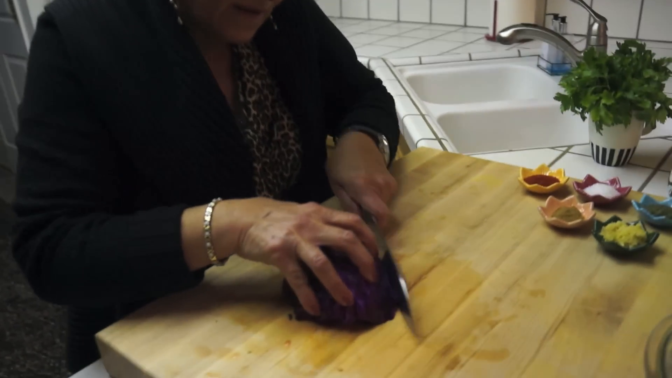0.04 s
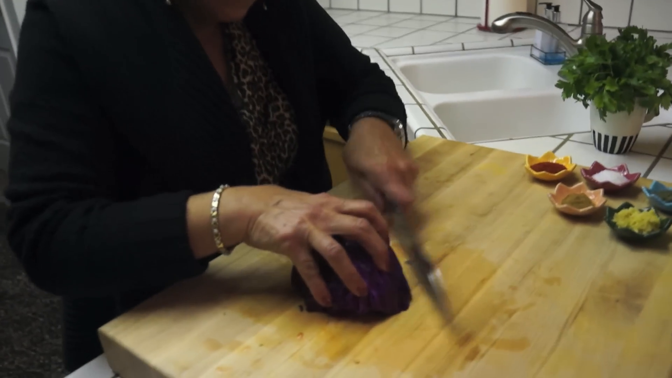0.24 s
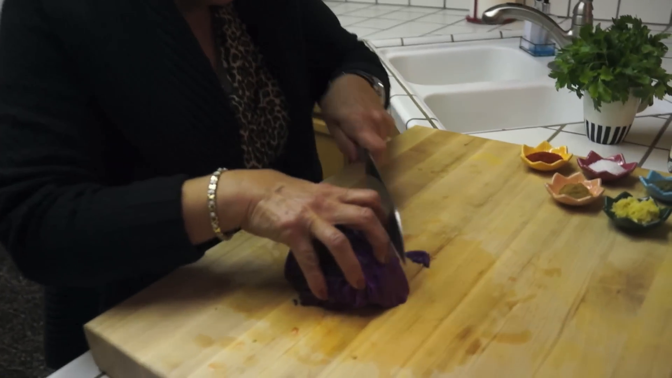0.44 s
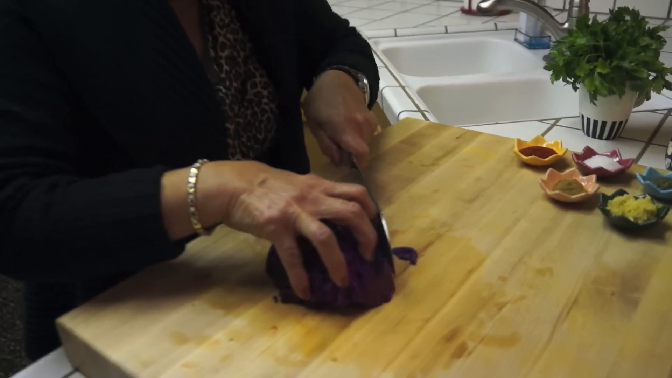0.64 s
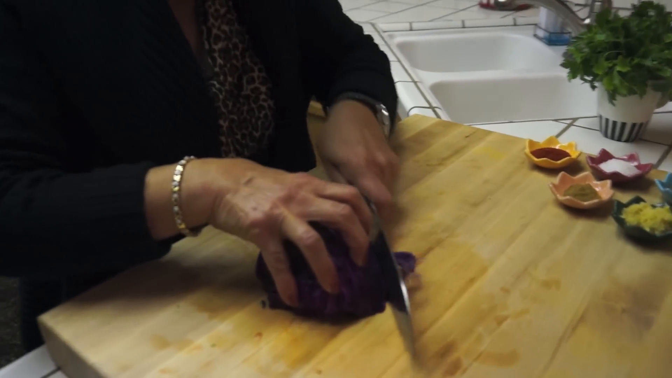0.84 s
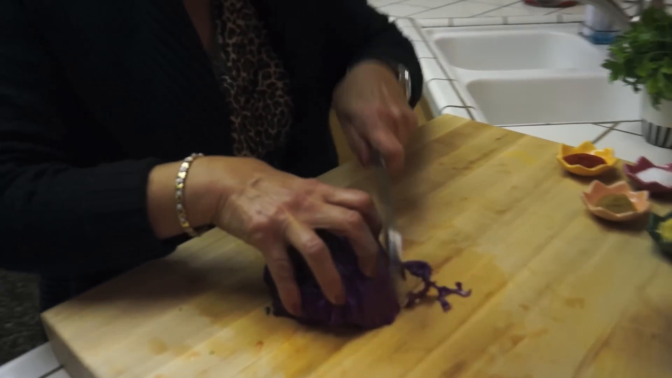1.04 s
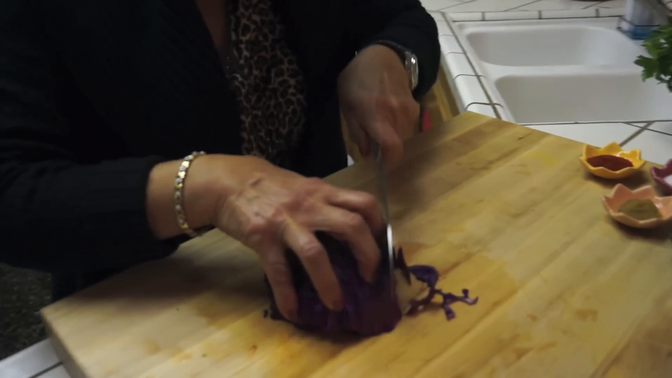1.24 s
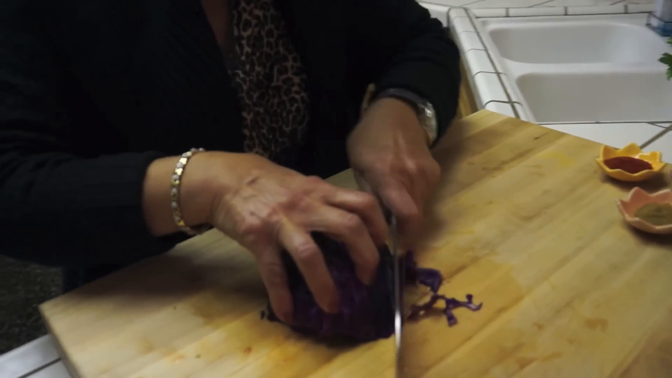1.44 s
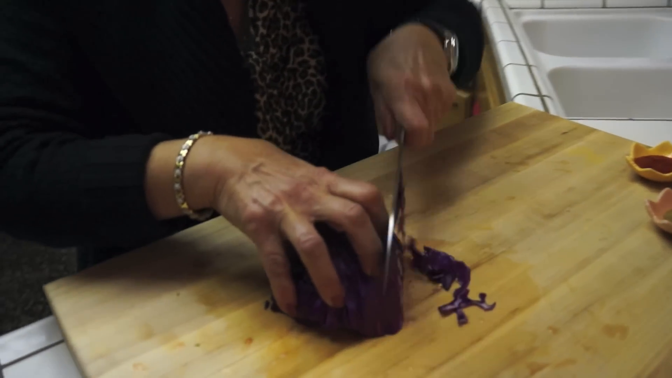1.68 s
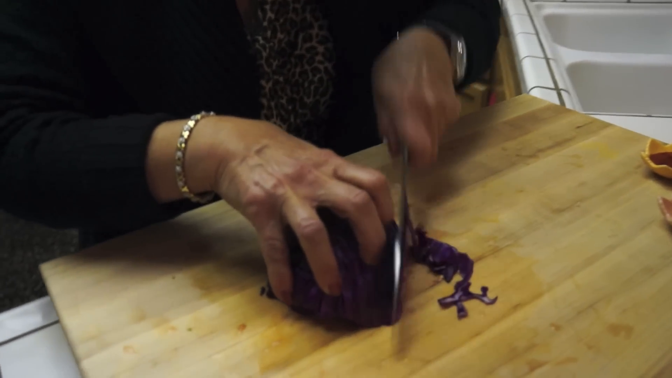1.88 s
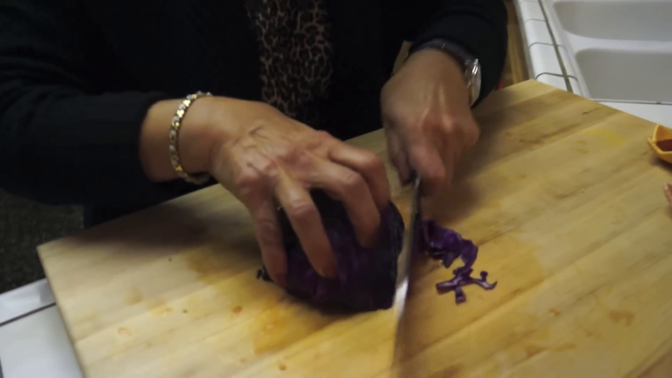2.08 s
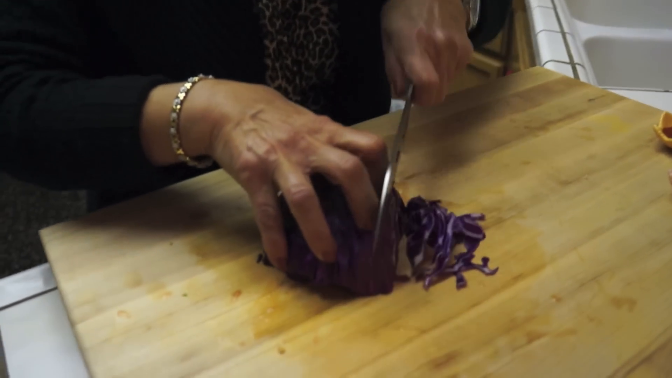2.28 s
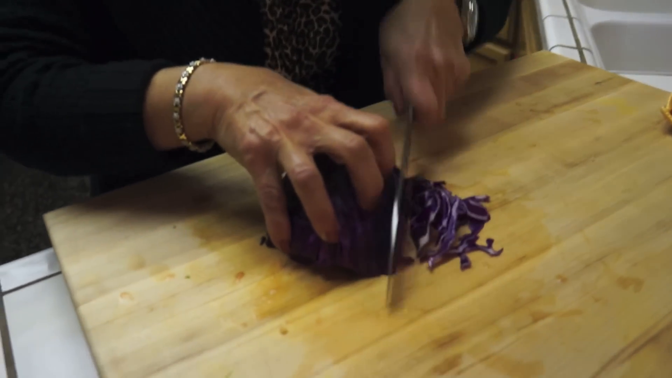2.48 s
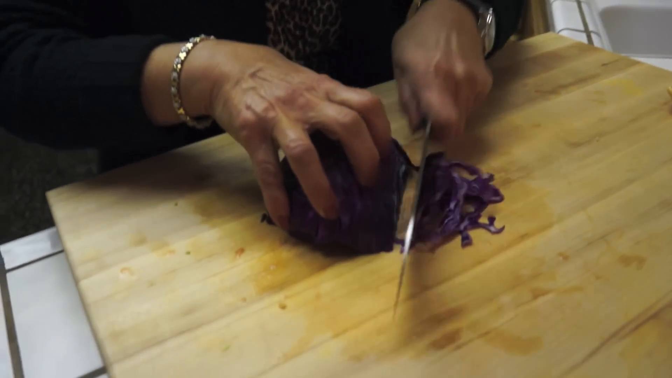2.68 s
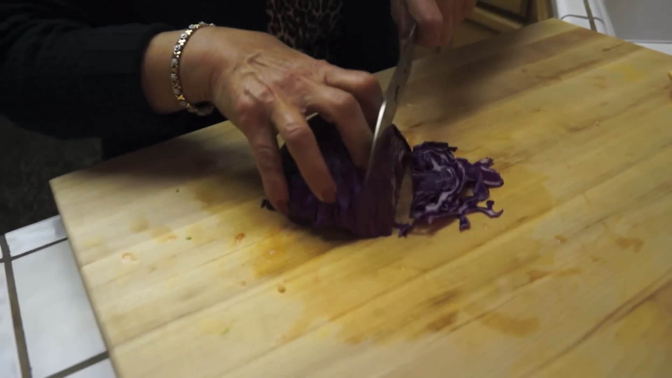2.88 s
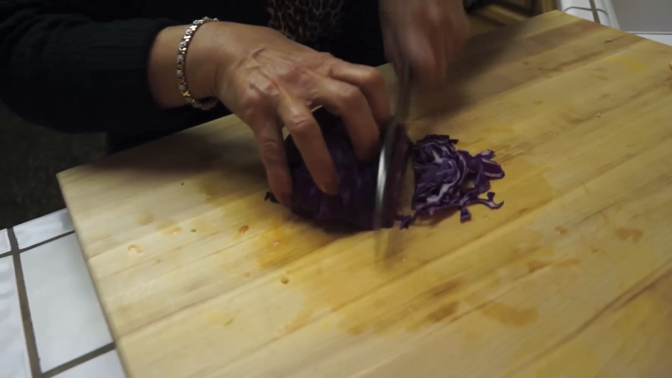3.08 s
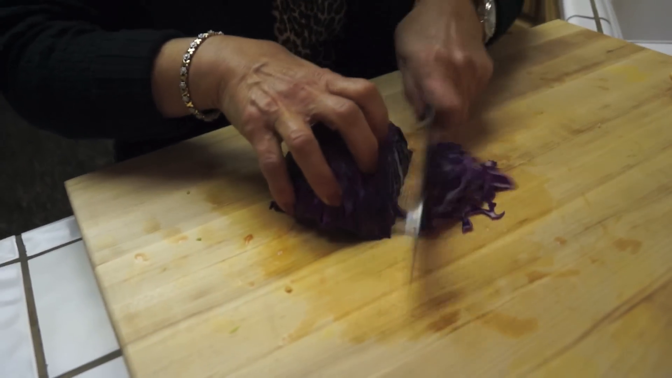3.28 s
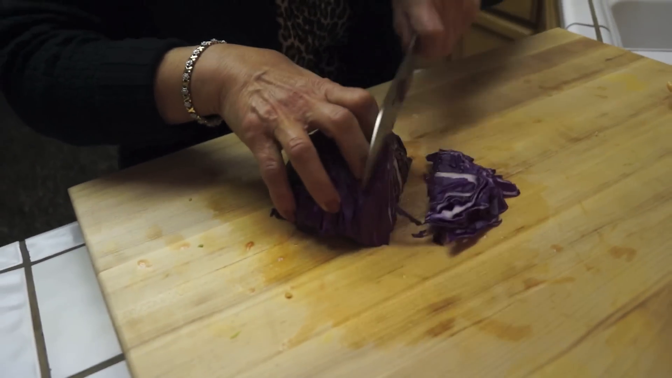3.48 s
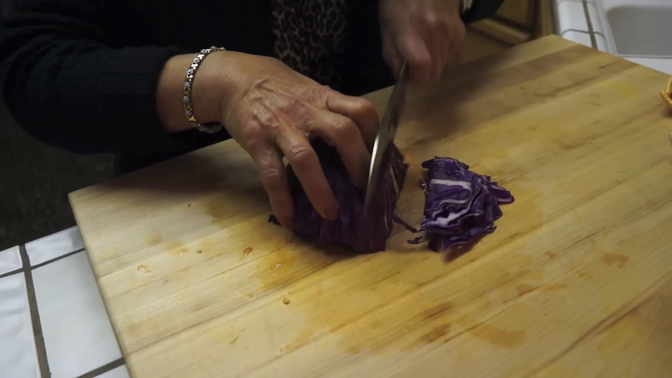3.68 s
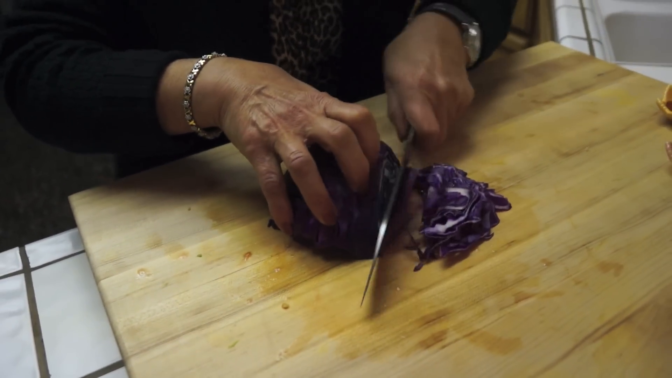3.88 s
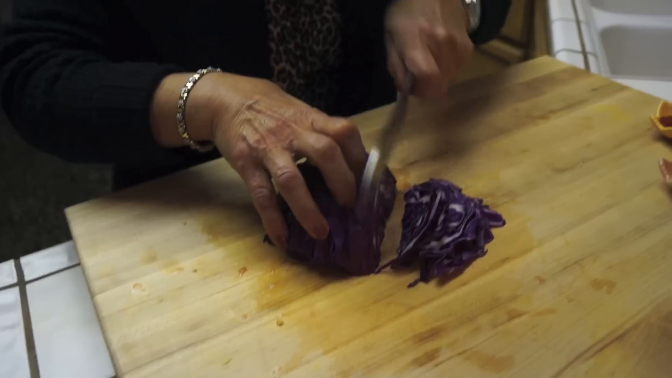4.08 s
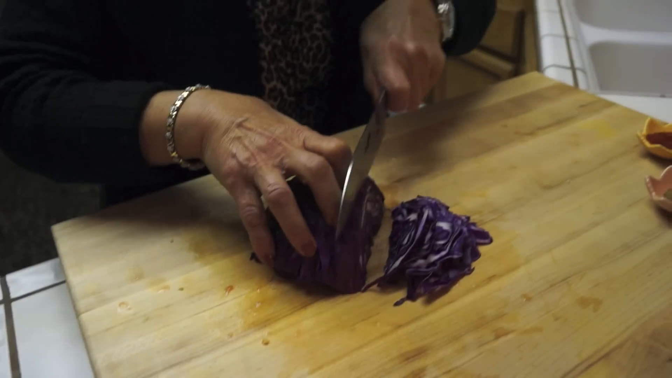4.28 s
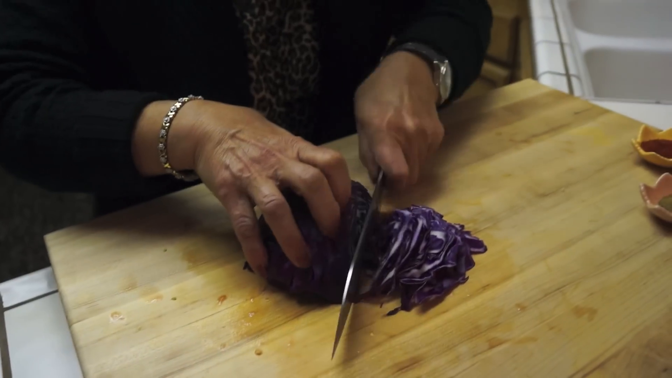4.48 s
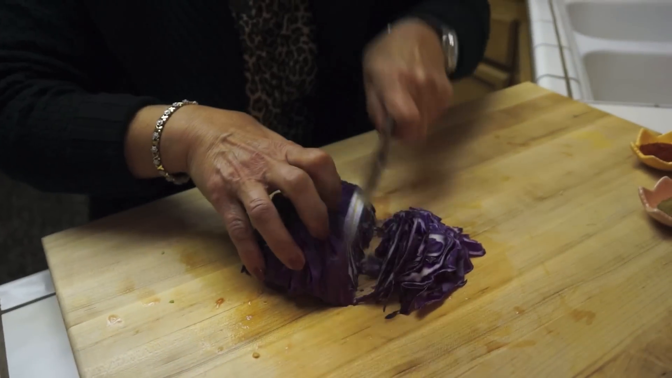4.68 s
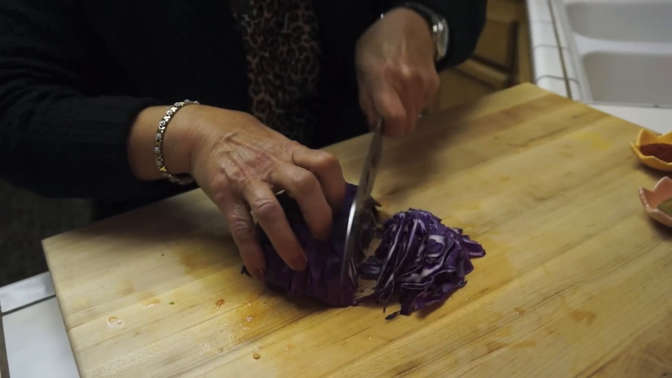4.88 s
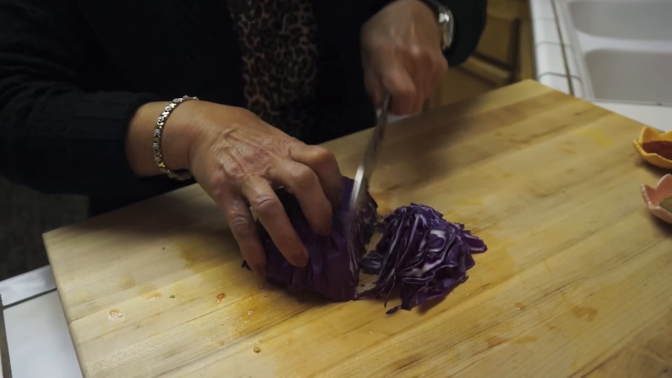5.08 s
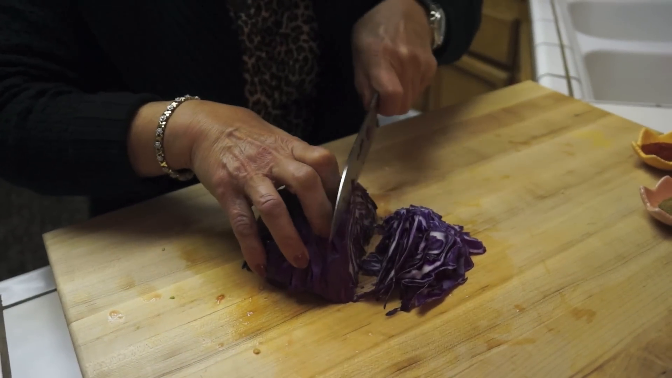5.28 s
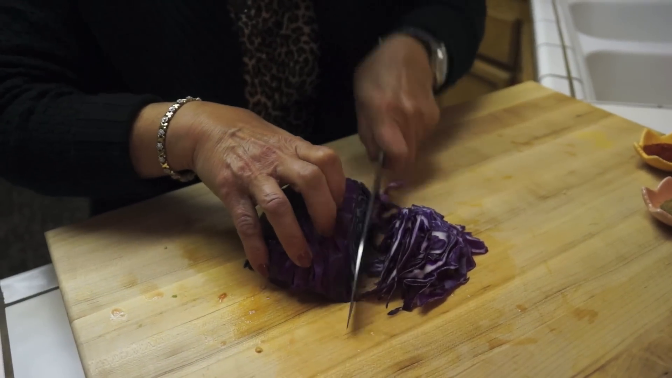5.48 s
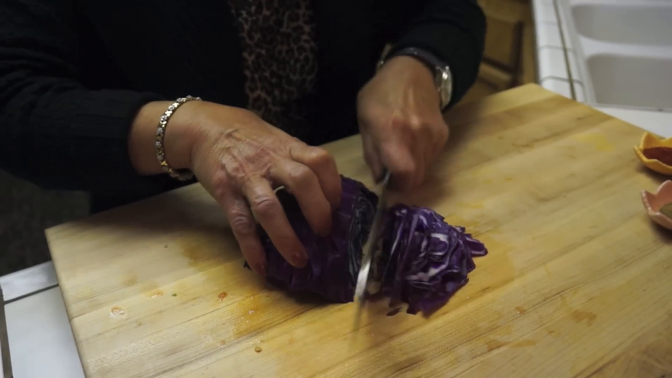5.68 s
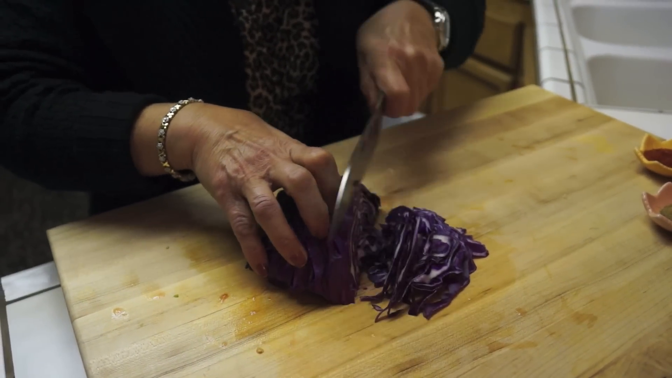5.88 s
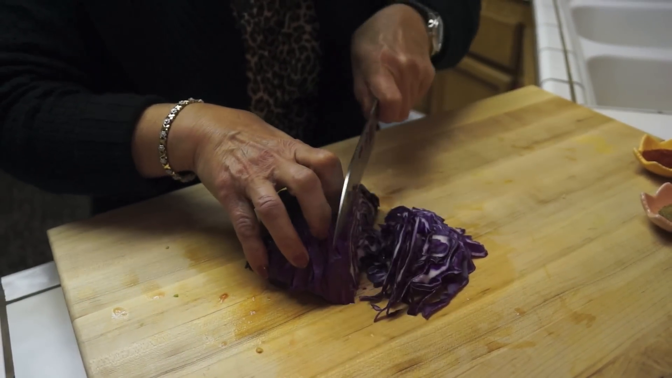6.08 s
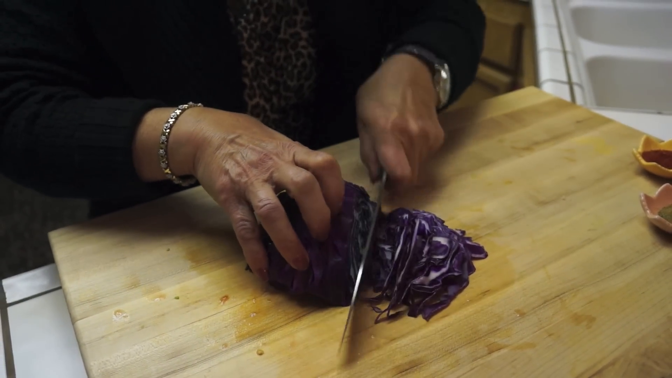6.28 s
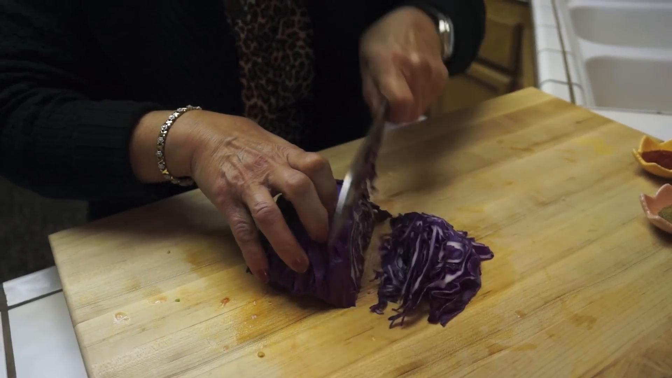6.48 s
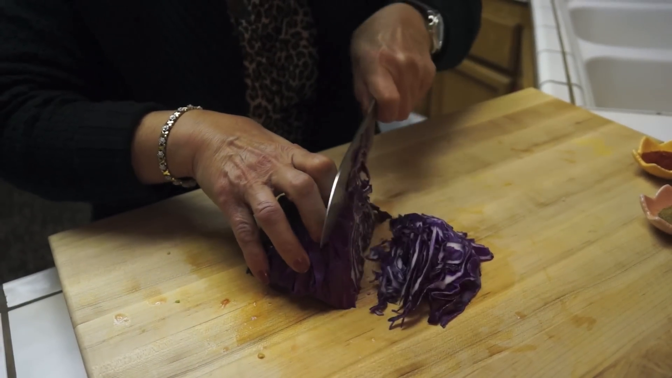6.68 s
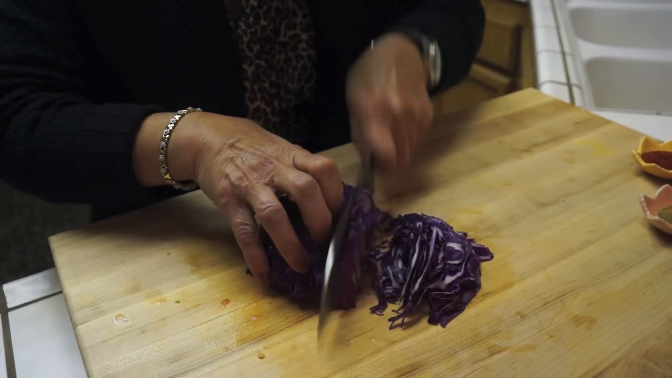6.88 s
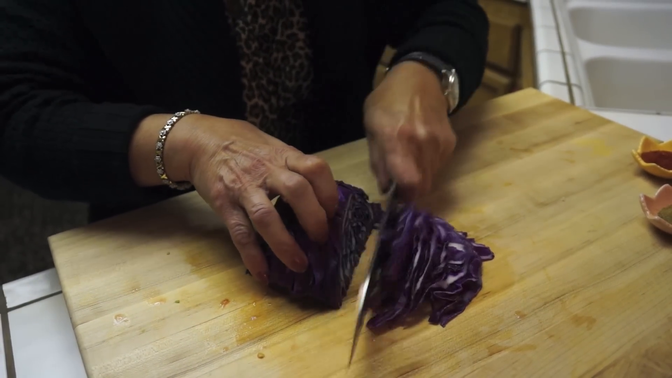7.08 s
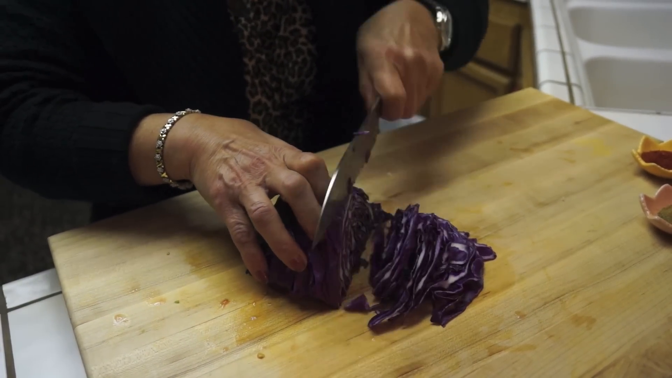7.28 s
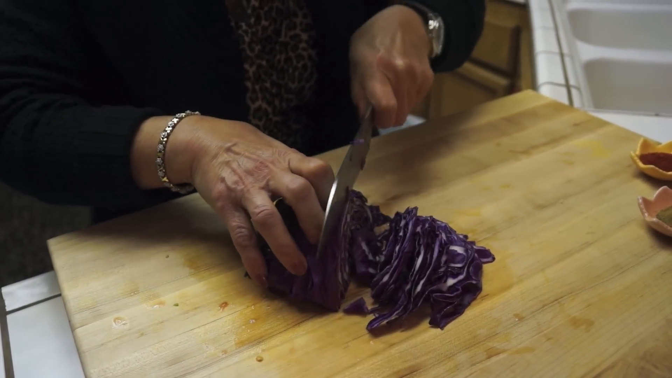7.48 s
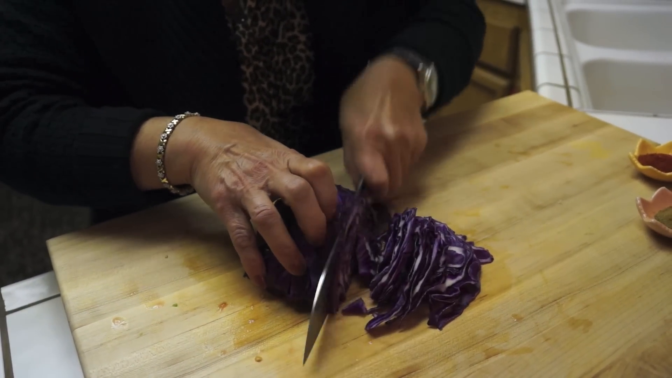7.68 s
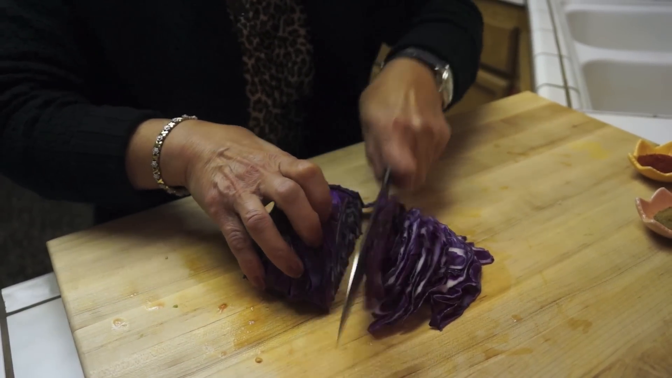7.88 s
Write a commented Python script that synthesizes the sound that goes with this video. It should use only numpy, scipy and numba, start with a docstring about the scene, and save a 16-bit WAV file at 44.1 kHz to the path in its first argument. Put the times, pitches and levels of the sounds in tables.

```python
"""A crunch and a knock on wood, over a faint hum: a chef's knife shreds a cabbage in a tiled kitchen.
Each stroke crunches (banded random clicks) and ends in a knock (board modes, crack and shudder).
The blade then drags back (softer clicks) and pings (steel modes); leaves snap (noise bursts).
Walls and a diffuse tail surround a small stereo camera; its look-ahead limiter ducks everything
at loud knocks and lets the room tail swell back up."""
import sys
import numpy as np
from scipy import signal
from scipy.io import wavfile
from scipy.ndimage import uniform_filter1d, minimum_filter1d
from numba import njit

SR = 44100
rng = np.random.default_rng(int(sys.argv[2]) if len(sys.argv) > 2 else 0)


def master(y):
    """Save y as 16-bit WAV."""
    cut = np.clip(np.atleast_2d(y).T, -1, 1)
    pcm = np.round(cut * 32767)  # scale
    wavfile.write(sys.argv[1], SR, pcm.astype(np.int16))


N = 350330
LEFT_RIGHT = np.array([[1], [-1]])  # signs of a side signal

# blade meets board: start_s, blow_db, upper_modes_db (relative to the blow)
KNOCK_TABLE = [(0.056, -10, -9.5), (0.757, -9.5, 2.5), (1.358, -9.5, 0), (1.931, -12.5, 6),
               (2.516, -10, 0.5), (3.119, -3, 2), (3.797, -3.5, -0.5), (4.439, -4.5, 8.5),
               (5.482, -13, 7.5), (6.209, -10, 11), (6.934, -8.5, 7.5), (7.699, -5, 0)]
# cut before each knock: bite_s, entry_db_per_s, bite_db, full_db,
# body_db (low bands relative to the crunch), approach_db (rustle at the bite)
CUT_TABLE = [(0.001, 300, -37.5, -32, -5, -58), (0.678, 150, -46, -31, -7, -62.5),
             (1.282, 450, -37.5, -26.5, -4.5, -56.5), (1.84, 698, -34, -25, -5.5, -65),
             (2.42, 1500, -33, -23.5, -7, -66), (2.999, 700, -30, -22.5, -9.5, -59),
             (3.61, 1500, -40.5, -22, -5.5, -60), (4.308, 1500, -35, -24, -4.5, -54.5),
             (5.406, 499, -32, -26, -4, -66.5), (6.142, 400, -34, -29.5, 0, -74),
             (6.801, 752, -28.5, -24, -3.5, -76), (7.543, 401, -35, -22, -3, -63)]


def undb(db):
    """Amplitude factor of a level in dB."""
    return 10 ** (np.asarray(db) / 20)


def unit(x):
    """Scale to RMS 1."""
    return x / np.sqrt(np.mean(x ** 2))


def band(x, hz, octaves):
    """Band-pass around hz."""
    edges_hz = np.clip(hz * 2. ** (np.array([-octaves, octaves]) / 2), 10, SR * .45)
    return signal.sosfilt(signal.butter(2, edges_hz, "band", fs=SR, output="sos"), x)


def highpass(x, hz, order):
    """Remove what lies below hz."""
    return signal.sosfilt(signal.butter(order, hz, "high", fs=SR, output="sos"), x)


def colour(table, hz):
    """Band level in dB from a density in dB per Hz, for a band whose width grows with hz."""
    table_hz, density_db = np.transpose(table)
    return np.interp(np.log(hz), np.log(table_hz), density_db) + 10 * np.log10(hz)


def ring(modes, seconds, spread_db=0.):
    """Decaying sines after one blow; each blow favours other modes by spread_db."""
    t = np.arange(int(seconds * SR)) / SR
    luck = rng.standard_normal(len(modes))
    out = np.zeros(len(t))
    for (hz, db, t60_s), k in zip(modes, luck):
        out += undb(db + spread_db * k - 60 * t / t60_s) * np.sin(2 * np.pi * hz * t)
    return out


def add(track, s, sound):
    """Mix a sound into the track at s seconds."""
    i = int(s * SR)
    track[i:i + len(sound)] += sound[:N - i]


def slope(t, s0, db0, s1, db1, swell, fade):
    """Gain that swells to db0, runs straight to db1 and fades; rates in dB per s."""
    line_db = np.interp(t, [s0, s1], [db0, db1])
    return undb(line_db - swell * np.maximum(s0 - t, 0) - fade * np.maximum(t - s1, 0))


def hum():
    """Kitchen background, noise bands that each waver a little; the bass is more alike on both sides."""
    # background spectrum: centre_hz, density_db (per Hz)
    spectrum = [(18, -29.5), (60, -6.5), (200, -5), (450, -0.5), (1100, -2.5), (2000, -6.5), (3000, -8),
                (4500, -15.5), (11000, -21.5)]
    # background level: time_s, level_db
    level = [(0, -58), (1.1, -61), (4.002, -67.5), (5.301, -69), (7.94, -66.5)]
    # two wavering notes: pitch_hz, level_db (relative to the background)
    notes = [(300, -16), (474, -10)]
    out = 0
    for hz in 30 * 2 ** np.arange(0, 8.6, .5):
        mid, side = (unit(band(rng.standard_normal(N), hz, 0.547)) for _ in range(2))
        waver = unit(uniform_filter1d(rng.standard_normal(N), size=6000))
        pair = mid + (0.36 + min(hz / 5000, .5)) * side * LEFT_RIGHT
        out = out + undb(colour(spectrum, hz) + 0.82 * waver) * pair
    out = unit(out)
    for hz, note_db in notes:
        out = out + undb(note_db) * unit(band(rng.standard_normal(N), hz, 0.029))
    s, level_db = np.transpose(level)
    return out * undb(np.interp(np.arange(N) / SR, s, level_db))


def worktop_rumble(cut_gain):
    """The push of each cut shakes the worktop: low noise that follows the crunch."""
    centre_hz, level_db = 55, -48
    noise = rng.standard_normal(N) + .6 * rng.standard_normal((2, N))  # shared part + own part per side
    shaking = cut_gain * unit(band(noise, centre_hz, 2.8))
    return band(undb(level_db) * shaking, centre_hz, 2.3)


def cabbage_groan(cut_gain):
    """The pressed head groans during each cut: narrow noise under a smoothed crunch envelope."""
    centre_hz, level_db = 265, -30
    tone = unit(band(rng.standard_normal(N), centre_hz, .5))
    return undb(level_db) * uniform_filter1d(cut_gain, size=900) * tone


def cracks(per_s, spread_db):
    """Cell walls bursting at random: signed clicks, a few much bigger than the rest."""
    when, size = rng.random((2, N))
    burst = when < per_s / SR
    height = np.maximum(size, .02) ** (-spread_db * np.log(10) / 20)
    return unit(burst * height * rng.standard_normal(N))


def leaves(gain, body_db, per_s, spread_db, broad, lumpy_db):
    """Broad cracks plus cracks of one pitch each; the lower bands follow the body of the cabbage."""
    # leaf spectrum: centre_hz, density_db (per Hz)
    spectrum = [(88, -52), (150, -10), (500, -12.5), (577, -1.5), (1180, -4.5), (1790, -1.5), (3130, -1.5),
                (6420, -9), (9030, -3.5), (11000, -15.5), (14300, -38), (22000, -120)]
    shared, out = cracks(per_s, spread_db), 0
    for hz in 150 * 2 ** np.arange(0, 6.5, .5):
        own = cracks(per_s * (hz / 4000) ** .5, spread_db)
        grains = band(broad * shared + own, hz, 0.5)
        low = 1 / (1 + (hz / 1900) ** 4)
        # the colour shifts from leaf to leaf
        drift = unit(uniform_filter1d(rng.standard_normal(N // 100 + 1), size=8))
        shift_db = 2.1764 * np.interp(np.arange(N) / 100, np.arange(len(drift)), drift)
        out = out + unit(grains) * undb(colour(spectrum, hz) - 42 + low * body_db + shift_db)
    # layers and ribs give way one after another
    lumps = unit(uniform_filter1d(rng.standard_normal(N), size=300))
    return gain * out * undb(lumpy_db * lumps)


def rustle():
    """Gain of the light leaf contact: approach, drag and lift at every cut, brushes in between."""
    # drag after each knock: lift_s, start_db, end_db (just before the lift), lift_db
    drags = [(0.11, -36, -47, -50.5), (0.87, -41.5, -45.5, -46), (1.522, -44.5, -53, -50.5),
             (2.1, -43.5, -53.5, -56), (2.599, -52, -45.5, -36.5), (3.27, -42, -47, -43),
             (3.93, -45.5, -52, -40.5), (4.572, -43, -54, -48), (5.646, -42, -45.5, -43),
             (6.361, -50, -44, -46), (7.067, -53.5, -51, -45.5), (7.85, -43, -49, -45)]
    # fingers and blade brush leaves: peak_s, peak_db, swell_db_per_s, fade_db_per_s
    brushes = [(0.242, -47, 400, 271), (0.53, -62, 900, 60), (1.674, -57, 2000, 55),
               (2.228, -60.5, 2000, 50.5), (2.383, -48, 3002, 100), (2.86, -62.5, 800, 101),
               (2.925, -52, 2000, 200.5), (4.886, -52, 200, 99.5), (5.934, -64, 200, 400),
               (6.617, -70, 250, 53)]
    approach_db_per_s, drag_wait_s, lift_db_per_s = 90, .01, 220.5
    t, gain = np.arange(N) / SR, np.zeros(N)
    for s, db, swell, fade in brushes:
        gain += slope(t, s, db, s, db, swell, fade)
    for (bite, *_, near_db), (lift, start_db, end_db, lift_db), (knock, *_) in zip(
            CUT_TABLE, drags, KNOCK_TABLE):
        gain += (t < bite) * slope(t, bite, near_db, bite, near_db, approach_db_per_s, 0)
        dragging = (t > knock + drag_wait_s) * (t < lift)
        gain += dragging * slope(t, knock, start_db, lift, end_db, 0, 0)
        gain += (t >= lift) * slope(t, lift, lift_db, lift, lift_db, 0, lift_db_per_s)
    return uniform_filter1d(gain, size=60)


def pings():
    """The steel rings in its own modes when flicked free, strongest near the pitch of the flick."""
    # blade modes: pitch_hz, level_db, t60_s (clean steel)
    steel_modes = [(2288, -6, .2), (3671, -4, .12), (4856, -4, .12), (5420, 0, .17), (5776, -9, .2),
                   (6891, -6, .18), (7617, -11, .15), (8129, -9, .1), (9098, -7, .14), (10340, -6, .1)]
    # flicks: start_s, level_db, near_hz (pitch excited most)
    flicks = [(0.244, -48, 3700), (2.2288, -51, 5530), (2.6744, -49, 6100), (2.9173, -50, 5330),
              (3.2744, -45, 5350), (3.932, -40, 3510), (4.5755, -40, 5420), (6.352, -37, 4400),
              (6.6069, -56, 9000), (7.0698, -43, 5410), (7.845, -45, 3690)]
    damping = 1.4  # leaves clinging to the steel shorten its ring
    out = np.zeros(N)
    for s, db, near_hz in flicks:
        modes = [(hz, mode_db - 12 * abs(np.log2(hz / near_hz)), t60_s / damping)
                 for hz, mode_db, t60_s in steel_modes]
        add(out, s, undb(db) * ring(modes, 0.34, spread_db=2.5))
    return out


def snaps():
    """Single leaf snaps and ticks: a short noise burst around one pitch over a duller thud."""
    # snaps: start_s, tick_peak_db, centre_hz, thud_db (relative to the tick peak)
    snap_events = [(0.2145, -41, 2468, -17.5), (0.5157, -46.5, 2674, -4), (0.678, -22, 3900, -37),
                   (1.094, -50, 3000, -12), (1.135, -48, 2500, -8), (1.535, -40, 4000, -15),
                   (1.674, -33.5, 7560, -13), (1.835, -28, 3350, -22), (2.1711, -39.5, 9530, -25),
                   (2.2277, -36.5, 5500, -31), (2.3812, -40, 3690, -25), (2.4183, -27.5, 3560, -26),
                   (2.5935, -23, 8674, -8), (2.859, -36, 5350, -26), (2.9197, -29.5, 5260, -37),
                   (2.97, -21, 4850, -29), (3.0033, -8.5, 4760, -36), (3.2744, -25, 5140, -8),
                   (3.3954, -45, 3330, -6), (3.5037, -31, 8920, -17.5), (3.6172, -22.5, 9250, -18),
                   (3.6754, -20, 3150, -19), (3.9306, -23, 2730, -7.5), (4.157, -40, 3196, -2),
                   (4.195, -46, 6000, -10), (4.262, -28.5, 2858, -19), (4.3066, -31.5, 3320, -13),
                   (4.34, -20, 4000, -15), (4.5752, -33, 5392, 1), (4.7074, -47, 3540, -16),
                   (4.7987, -43.5, 2450, -14), (4.877, -34.5, 2773, -9), (5.1457, -48.5, 3000, -19.5),
                   (5.168, -46.5, 2590, -7), (5.456, -13, 8920, -25), (5.9258, -46, 6070, -9.5),
                   (6.607, -37, 9000, -11), (6.769, -28.5, 2780, -9.5), (6.868, -16, 2953, -25),
                   (7.069, -33, 5367, -14), (7.293, -50, 1900, -10), (7.3361, -43.5, 5090, -5),
                   (7.4614, -42, 9000, -25), (7.8436, -20.5, 2920, -14)]
    t60_s = .034
    out, t = np.zeros(N), np.arange(SR // 10) / SR
    for s, db, hz, thud_db in snap_events:
        burst = rng.standard_normal((2, len(t))) * undb(-60 * t / t60_s)
        tick, thud = band(burst[0], hz, 2.73), band(burst[1], 700., 1.643)
        tick, thud = tick / abs(tick).max(), thud / abs(thud).max()
        add(out, s, undb(db) * (tick + undb(thud_db) * thud))
    return out


def crunch():
    """Gain and body of the cuts: the edge enters, bites, swells and falls silent just before the board."""
    full_before_knock_s, through_before_knock_s, entry_body_db = 0.026, 0.0018, 4.5
    t, gain, body_db = np.arange(N) / SR, np.zeros(N), np.zeros(N)
    for (bite, entry, bite_db, full_db, body, _), (knock, *_) in zip(CUT_TABLE, KNOCK_TABLE):
        on = (t > bite - .2) & (t < knock - through_before_knock_s)
        gain[on] = slope(t[on], bite, bite_db, knock - full_before_knock_s, full_db, entry, 0)
        body_db[on] = body + entry_body_db * np.clip((bite - t[on]) / 0.04, 0, 1)
    return uniform_filter1d(gain, size=60), body_db


def knocks():
    """A short push rings the board; the edge adds a crack; board and worktop shudder on, never twice alike."""
    # board modes: pitch_hz, level_db, t60_s
    wood_modes = [(580, -33, 0.035), (820, -11.5, 0.035), (980, -1, 0.023), (1144.4, 2.5, 0.017),
                  (1336, 8, 0.014), (1700, 1.5, 0.012383), (1931, -8, 0.032), (2260, -7, 0.018),
                  (2850, -15.5, 0.02)]
    out, t = np.zeros(N), np.arange(SR // 2) / SR
    push = signal.windows.hann(int(0.00045 * SR) + 2)
    for s, db, upper_db in KNOCK_TABLE:
        modes = [(hz, mode_db + upper_db * (hz > 1500), t60_s) for hz, mode_db, t60_s in wood_modes]
        wood = np.convolve(ring(modes, .5, spread_db=2.5), push / push.sum())[:len(t)]
        wood *= 1 - np.exp(-t / 0.0008)  # bending waves need a moment to spread over the board
        crack = band(rng.standard_normal(len(t)), 4000., 2.5) * np.exp(-t / 0.0037)
        high, low = (unit(band(band(rng.standard_normal(len(t)), hz, 1.23), hz, 1.23))
                     for hz in (1650., 900.))
        shudder = undb(upper_db - 21.5) * high + undb(-17) * low
        shudder *= (1 - np.exp(-t / .03)) * np.exp(-t / 0.046)
        add(out, s + .0003, undb(db) * (undb(-18.0) * crack + shudder - wood))
    return highpass(out, 370, order=3)


def room_response():
    """Near walls, standing waves and a diffuse tail that builds up and dies by band."""
    # reverberation: centre_hz, relative_db, t60_s
    tail_bands = [(200, -10.5, 0.7), (415.15, 3, 0.32), (838, 1, 0.3173), (1550, -2, 0.3249),
                  (3076, -5.5, 0.34), (6850, 0, 0.1844), (10000, -16.5, 0.0001)]
    # standing waves: pitch_hz, level_db, t60_s
    standing_waves = [(373, -58, 0.4), (439.3, -51, 0.43)]
    # near walls: delay_s, left_db, right_db
    wall_echoes = [(.0054, -10, -9), (0.0137, -14.5, -18.5), (0.028, -20.5, -15)]
    tail_db, full_side_hz = -38, 2010
    t = np.arange(SR // 2) / SR
    room = np.zeros((2, len(t))) + ring(standing_waves, .5)
    for hz, db, t60_s in tail_bands:
        mid, side = (unit(band(rng.standard_normal(len(t)), hz, 0.85)) for _ in range(2))
        # long waves reach both capsules alike
        pair = mid + min(hz / full_side_hz, 1) * side * LEFT_RIGHT
        decay = undb(tail_db + db - 60 * t / t60_s) * (1 - np.exp(-t / 0.004))
        room += pair * decay * np.sqrt(hz / 8000)
    for s, left_db, right_db in wall_echoes:
        room[:, int(s * SR)] += undb([left_db, right_db])
    return room


def kitchen(board, light):
    """Direct sound with scattered treble plus the room, panned right except for the long waves."""
    scatter_db, scatter_decay_s = -33, 0.011
    along_edge = .45  # side level of cracks wandering along the blade
    light_room_db, pan_right_db, pan_from_hz = -4, 3, 240
    t = np.arange(SR // 2) / SR
    room = room_response()
    # board, hands and camera body scatter the treble differently to each capsule
    scatter = unit(band(rng.standard_normal((2, len(t))), 3000., 3.6))
    near = undb(scatter_db) * scatter * np.exp(-t / scatter_decay_s)
    near[:, 0] = 1
    # small things radiate little bass
    board, light = highpass([board, light], 240, order=2)
    direct = signal.fftconvolve((board + light)[None], near, axes=1)
    place = unit(uniform_filter1d(rng.standard_normal(N), size=200))
    direct[:, :N] += along_edge * band(light * place, 6000., 2.5) * LEFT_RIGHT
    # the board also drives the worktop, so it fills the room more
    wet = signal.fftconvolve((board + undb(light_room_db) * light)[None], room, axes=1)
    both = (direct + wet)[:, :N]
    # long waves bend round the camera
    low = signal.sosfilt(signal.butter(1, pan_from_hz, fs=SR, output="sos"), both)
    return low + (both - low) * undb([[-pan_right_db / 2], [pan_right_db / 2]])


def scene():
    """Cuts, rustle, snaps, pings and knocks in the kitchen, over hum and worktop rumble."""
    cut_gain, body_db = crunch()
    cut = leaves(cut_gain, body_db, per_s=4000, spread_db=2.0, broad=0.4491, lumpy_db=1.45)
    brush = leaves(rustle(), 3.7, per_s=3000, spread_db=0.5, broad=0.32, lumpy_db=2.5)
    light = cabbage_groan(cut_gain) + cut + brush + snaps() + pings()
    return kitchen(knocks(), light) + hum() + worktop_rumble(cut_gain)


@njit
def fall(peak, keep):
    """Peak follower: jumps up at once, sinks at a fixed rate."""
    out, e = np.empty(len(peak)), 1e-9
    for i in range(len(peak)):
        e = max(peak[i], e * keep)
        out[i] = e
    return out


def record(dry):
    """The camera's limiter, which sees a little ahead, and a steep top cut."""
    threshold_db, ratio, release_db_per_s = -17.5, 2.5, 83
    ahead_s, sense_s, top_hz = 0.002, 0.003, 11000
    ahead = int(ahead_s * SR)
    loud = uniform_filter1d(abs(dry).max(0), int(sense_s * SR))
    held = fall(loud, float(undb(-release_db_per_s / SR)))
    over = np.maximum(held / undb(threshold_db), 1)
    gain = minimum_filter1d(over ** (1 / ratio - 1), 2 * ahead + 1)
    limited = dry * uniform_filter1d(gain, ahead // 2)
    return signal.sosfilt(signal.ellip(10, .3, 75, top_hz, fs=SR, output="sos"), limited)


dry = scene()
out = record(dry)
master(out)
```